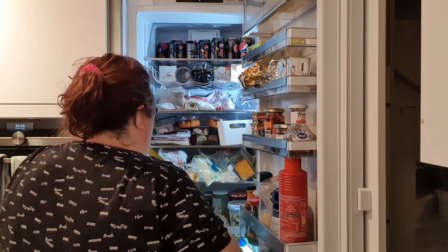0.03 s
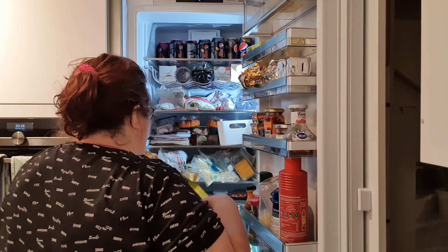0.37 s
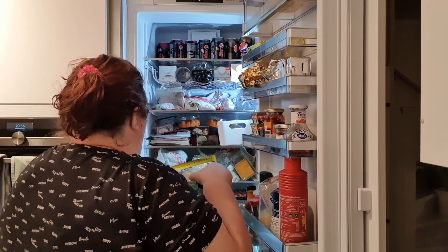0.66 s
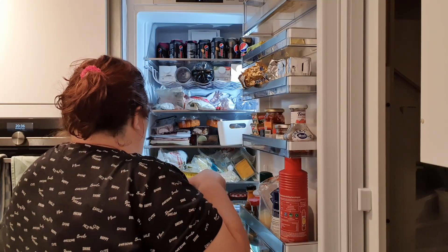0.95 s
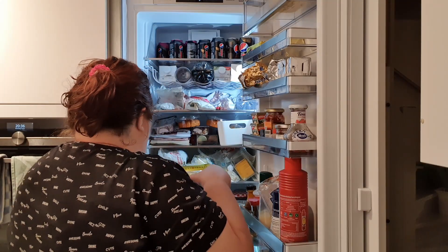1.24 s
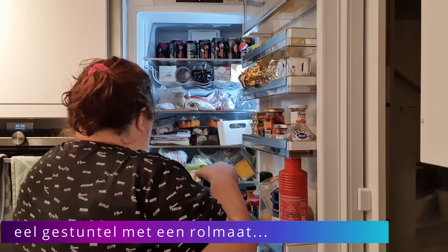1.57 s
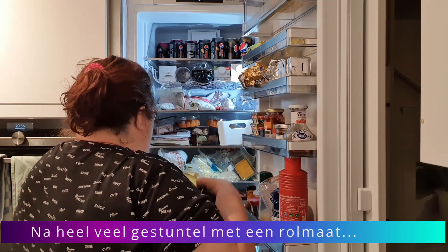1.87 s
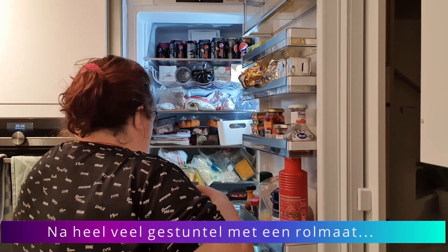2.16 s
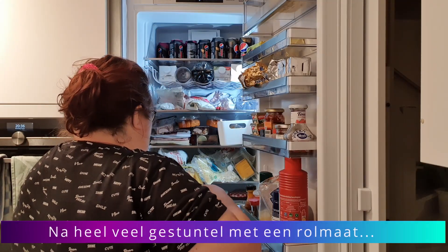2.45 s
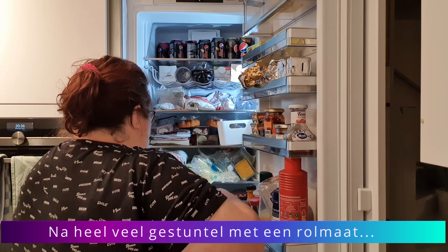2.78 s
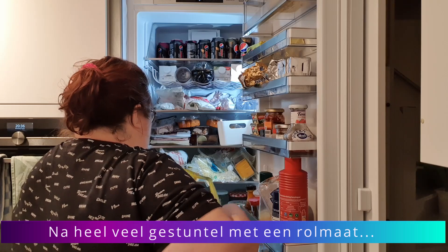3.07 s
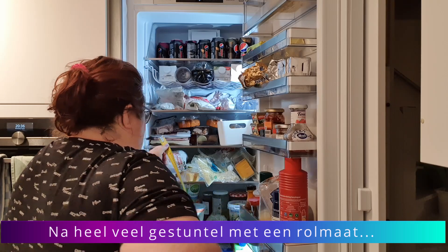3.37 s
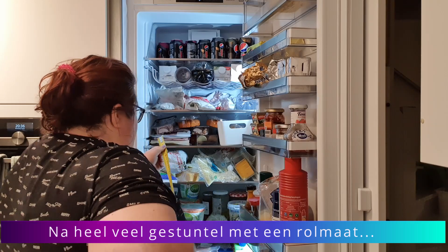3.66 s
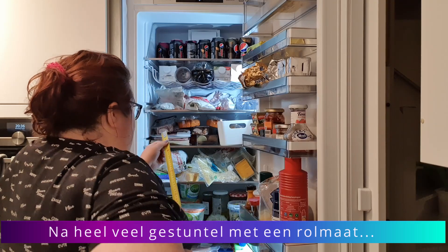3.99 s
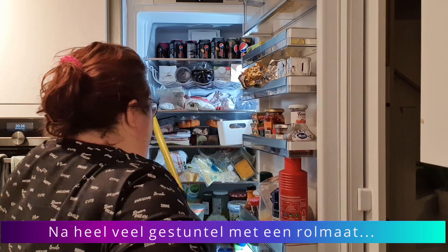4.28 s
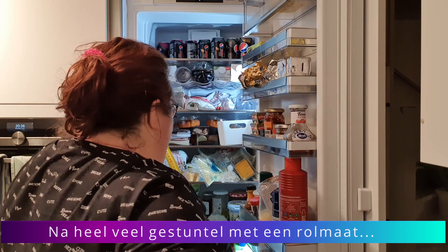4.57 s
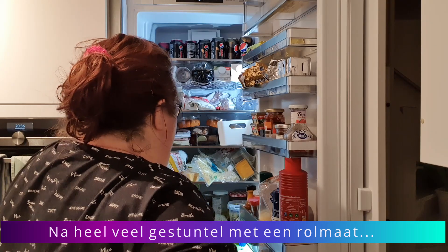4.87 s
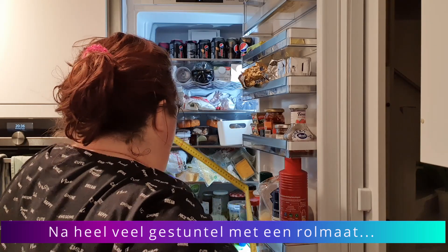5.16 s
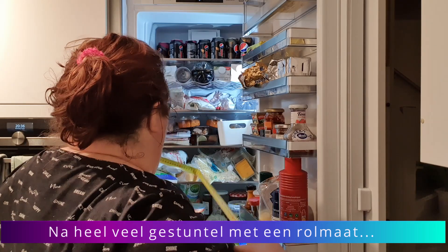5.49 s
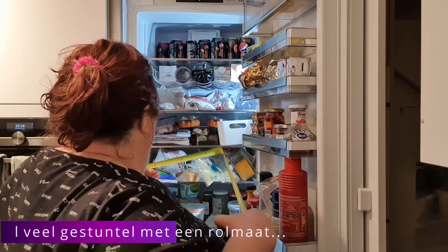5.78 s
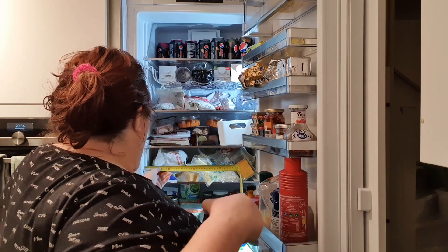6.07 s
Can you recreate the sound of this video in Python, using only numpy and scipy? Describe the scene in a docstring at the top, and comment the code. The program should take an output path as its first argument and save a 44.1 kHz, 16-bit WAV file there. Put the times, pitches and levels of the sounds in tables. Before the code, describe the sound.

A steel tape measure is handled inside an open fridge, heard nearby with a short kitchen echo over faint appliance hum, hiss and low rumble. It starts with light ticks and whispery slides of the blade. The case knocks hollowly on plastic at about 0.9 seconds and several times between 1.6 and 1.9, with a dull scuff. Scattered metallic ticks and small clicks follow, with more bumps around 3.1. At 3.7 seconds the end hook gives a loud, sharp click. From 4.3 to 4.4 the blade rasps brightly through its case and rattles, then buckles with a loud ringing clack at 4.6. Soft sliding and a few faint ticks continue until about 6 seconds, when a firm knock, a quick steel clatter and another short rasp end it.

```python
"""A small kitchen, at an open fridge, with a faint appliance hum, hiss and low rumble underneath.
A steel tape measure is fed inside: its blade whispers over the shelves in tiny slips, rasps through
its case, and ticks and rings as it strikes or buckles. The end hook clicks, and the case knocks
hollowly on plastic drawers and food boxes. The fridge cavity and the kitchen answer every contact."""
import sys
import numpy as np
from scipy import signal
from scipy.fft import rfft, irfft, next_fast_len
from scipy.io import wavfile
from scipy.ndimage import map_coordinates

SR = 44100
rng = np.random.default_rng(int(sys.argv[2]) if len(sys.argv) > 2 else 0)


def generate_wav(signal):
    """Clip the signal to [-1, 1] and save it as 16-bit WAV at the path in sys.argv[1]."""
    frames = np.transpose(np.atleast_2d(signal))
    scaled = np.clip(frames, -1, 1) * 32767
    pcm = np.round(scaled).astype(np.int16)
    wavfile.write(sys.argv[1], SR, pcm)


N = 274857


def amp(db):
    """Decibels to gain."""
    return 10 ** (np.asarray(db) / 20)


def unit(x):
    """Scale to rms 1."""
    return x / np.sqrt(np.mean(x ** 2) + 1e-20)


def along(points, hz):
    """Read a curve of (frequency, value) points on a log frequency axis."""
    freqs, values = np.transpose(points)
    return np.interp(np.log(hz + 1), np.log(freqs + 1), values)


def wobble(rate):
    """Smooth random modulation, rate knots a second."""
    knots = rng.standard_normal(int(N * rate / SR) + 4)
    return map_coordinates(knots, [np.arange(N) * rate / SR])


def swell(peak_s, rise_s, fall_s, db):
    """Envelope of one stroke: up 20 dB per rise_s to its peak, then down 20 dB per fall_s."""
    age = np.arange(N) / SR - peak_s
    return amp(db) * 10 ** -np.maximum(-age / rise_s, age / fall_s)


def coloured(x, db_at):
    """Minimum-phase EQ with a gain of db_at(hz) decibels."""
    n = x.shape[-1]
    size = 2 * next_fast_len(n // 2 + SR // 8)
    gain = amp(db_at(np.fft.rfftfreq(size, 1 / SR)))
    cepstrum = irfft(np.log(gain + 1e-6), size)
    cepstrum[1:size // 2] *= 2
    cepstrum[size // 2 + 1:] = 0
    return irfft(rfft(x, size) * np.exp(rfft(cepstrum)), size)[..., :n]


def body(spectrum, modes):
    """EQ curve of an object: a broad spectrum plus a bell for each mode."""
    return lambda hz: along(spectrum, hz) + sum(
        db / (1 + (2 * (hz - centre) / width) ** 2) for centre, width, db in modes)


def add(out, s, x):
    """Mix x into out from time s."""
    part = out[:, max(0, round(s * SR)):][:, :x.shape[1]]
    part += x[:, :part.shape[1]]


def noise(spectrum, side_db):
    """Steady stereo noise of rms 1."""
    mid, side = coloured(rng.standard_normal((2, N)), lambda hz: along(spectrum, hz))
    return unit(np.array([mid + amp(side_db) * side, mid - amp(side_db) * side]))


# Reverb time of the kitchen: (frequency [Hz], 60 dB decay [s])
KITCHEN_DECAY = [(200, 0.49), (800, 0.32), (2000, 0.32), (5500, 0.3), (10000, 0.29), (16000, 0.21)]

def space(chatter_s, room_db, cavity_t60=0.05, build_s=0.0097, mono_hz=600, rebounds=12):
    """Impulse response: rebounds within chatter_s scatter in the fridge, then the kitchen's tail."""
    hz, t, grains = signal.stft(rng.standard_normal((6, SR // 2)), SR, nperseg=256)
    grains = grains.reshape(2, 3, *grains.shape[1:])  # cavity and tail, each left, right and shared
    alike = .06 + .94 / (1 + (hz[:, None] / mono_hz) ** 3)  # long waves reach both sides alike
    cavity, tail = np.sqrt(alike) * grains[:, 2:] + np.sqrt(1 - alike) * grains[:, :2]
    decay = amp(-60 * t / along(KITCHEN_DECAY, hz)[:, None])
    cavity = signal.istft(cavity, SR, nperseg=256)[1]
    tail = signal.istft(tail * decay, SR, nperseg=256)[1]
    t = np.arange(tail.shape[1]) / SR
    age = t - np.clip(chatter_s, .0005, .05) * np.sort(rng.random(rebounds))[:, None]
    rebound_energy = (age >= 0) * amp(-120 * np.abs(age) / cavity_t60)
    cavity *= np.sqrt(rebound_energy.sum(axis=0))
    tail *= 1 - np.exp(-t / build_s)  # the walls answer a little later
    return cavity / np.linalg.norm(cavity[0]) + amp(room_db) * tail / np.linalg.norm(tail[0])


def friction(envelope, colour, slips_per_s, spread_db):
    """Tiny uneven slips, heard through the body, fridge and room; echoes change as the contact travels."""
    slips = rng.standard_normal(N) * (rng.random(N) < slips_per_s / SR)
    slips = envelope * unit(slips * amp(spread_db * wobble(90)))
    out = np.zeros((2, N))
    step = round(0.3 * SR)
    for start in range(0, N, step):
        if envelope[start:start + step].max() > amp(-90):
            echoes = space(chatter_s=0.0029, room_db=-7)
            add(out, start / SR, signal.fftconvolve(slips[None, start:start + step], echoes, axes=1))
    eq_gain = amp(colour(np.linspace(0, SR / 2, SR // 20)))
    return coloured(out, colour) / np.sqrt(np.mean(eq_gain ** 2))


# Partials of the appliance hum: (frequency [Hz], relative level [dB])
HUM_PARTIALS = [(129.2, -70), (226.1, -58), (269.2, -67.5), (349.9, -76.5)]
# EQ of the room hiss: (frequency [Hz], gain [dB])
HISS_EQ = [(120, -20.5), (200, -20), (240, -2), (482, -20.5), (623, -19.5), (1250, -33), (2380, -34.5),
           (6640, -28), (7830, -34), (11500, -34.5), (16000, -60)]

def room_tone(hum_db=-1, drift_per_s=20, steady=0.68, hiss_db=-66):
    """A wavering appliance hum over faint hiss."""
    t = np.arange(N) / SR
    hum = np.zeros(N)
    for hz, db in HUM_PARTIALS:
        swing = steady + wobble(drift_per_s) + 1j * wobble(drift_per_s)  # level and phase both wander
        hum += amp(db + hum_db) * unit(np.real(swing * np.exp(2j * np.pi * hz * t)))
    return hum + amp(hiss_db) * noise(HISS_EQ, side_db=-3.5)


# An arm leans on the cabinet: (peak time [s], rise [s], fall [s], level [dB])
ARM_SHOVES = [(1.85, 0.6, 0.9, -55.5), (3.18, 0.27, 0.2, -47), (4.4, 0.37, 0.27, -49.5),
              (5.06, 0.14, 0.13, -54.5), (5.99, 0.031, 0.2, -45.5)]
# EQ of the rumble: (frequency [Hz], gain [dB])
RUMBLE_EQ = [(20, -27), (35, -21), (55, -2.5), (80, -3), (115, -1.5), (150, -6), (200, -9.5), (300, -22.5),
             (500, -68)]

def cabinet_rumble(rest_db=-63, waver_db=2, shake_db=-55, follows=0.2, rise_s=0.03, fall_s=0.3):
    """Low room noise; shoves move the cabinet, and each tap and bump shakes it, hard ones a bit more."""
    rest = amp(rest_db + waver_db * wobble(5))
    hits = list(BLADE_HITS) + list(CASE_HITS)
    shakes = [(s, rise_s, fall_s, shake_db + follows * db) for s, db, *_ in hits]
    power = rest ** 2 + sum(swell(*move) ** 2 for move in shakes + list(ARM_SHOVES))
    return np.sqrt(power) * noise(RUMBLE_EQ, side_db=-11.5)


# Plastic rubs on a shelf: (peak time [s], rise [s], fall [s], relative level [dB])
PLASTIC_RUBS = [(1.53, 0.22, 0.47, -53.5), (3.045, 0.05, 0.11, -50), (5.06, 0.2, 1, -64.5)]
# EQ of the rub: (frequency [Hz], gain [dB])
RUB_EQ = [(150, -42), (380, 1.5), (750, 3.5), (950, -16), (2500, -16.5), (6000, -58.5)]
# Drawer resonances, also used for the reel and the bumps: (frequency [Hz], width [Hz], gain [dB])
PLASTIC_MODES = [(383, 19, 10.5), (497, 180, 5.5), (637, 196, 7), (1144, 37, 5), (1380, 84, -9.5),
                 (1998, 160, 9), (2240, 29, 6.5), (3290, 220, 4), (3950, 220, 6)]

def plastic_drag(level_db=-1):
    """Plastic sticks and slips on a shelf with a dull scuff."""
    pressure = sum(swell(*rub) for rub in PLASTIC_RUBS)
    return amp(level_db) * friction(pressure, body(RUB_EQ, PLASTIC_MODES), slips_per_s=700, spread_db=1)


# Blade strokes, some just before it catches: (peak time [s], rise [s], fall [s], relative level [dB])
CREEP_STROKES = [(0.0, 0.01, 0.1, -38), (0.34, 0.27, 0.23, -69.5), (0.471, 0.018, 0.0098, -38.5),
                 (0.55, 0.1, 0.11, -51), (0.73, 0.02, 0.093, -69.5), (1.115, 0.02, 0.02, -46),
                 (1.23, 0.12, 0.21, -61), (1.86, 0.07, 0.42, -56), (2.406, 0.019, 0.037, -38),
                 (2.479, 0.018, 0.014, -41), (3.06, 0.35, 0.68, -49), (3.45, 0.3, 0.36, -55.5),
                 (3.88, 0.2, 0.24, -47), (4.25, 0.14, 0.22, -30.5), (4.55, 0.2, 0.13, -48),
                 (5.08, 0.028, 0.06, -46), (5.17, 0.85, 0.91, -53.5), (5.94, 0.13, 0.078, -57.5)]
# EQ of steel on a shelf: (frequency [Hz], gain [dB])
CREEP_EQ = [(500, -51), (900, -12), (1400, -11.5), (2000, -8), (2700, -9.5), (3500, -4.5), (4200, -3.5),
            (5200, -8), (6700, -5), (7900, -12.5), (11000, -14), (16000, -16)]

def blade_creep(level_db=-4):
    """The blade whispers over the shelves in fine, dense slips."""
    motion = sum(swell(*stroke) for stroke in CREEP_STROKES)
    return amp(level_db) * friction(motion, lambda hz: along(CREEP_EQ, hz), slips_per_s=2900, spread_db=1.5)


# The blade runs in its case: (peak time [s], rise [s], fall [s], relative rasp [dB], relative reel [dB])
BLADE_PULLS = [(4.325, 0.15, 0.11, -23, -33.5), (4.403, 0.02, 0.074, -25, -27),
               (6.032, 0.037, 0.073, -20.5, -36)]
# EQ of the rasp: (frequency [Hz], gain [dB])
RASP_EQ = [(710, -21.5), (1200, -6.5), (2180, -9), (2590, -4.5), (4080, -4), (5300, -7.5), (6800, -4),
           (7660, -10), (8630, -8.5), (14000, -18), (16000, -35.5)]
# EQ of the reel: (frequency [Hz], gain [dB])
REEL_EQ = [(100, -32.5), (250, 0.5), (400, -1.5), (520, -2), (700, 2.5), (1000, -4), (1500, -2.5),
           (2500, -15.5), (6000, -57)]

def blade_run(rasp_db=-5, reel_db=-5):
    """Bright steel rasps through the case over the darker, coarser grain of the reel."""
    rasp_envelope = sum(swell(*shape, db) for *shape, db, _ in BLADE_PULLS)
    reel_envelope = sum(swell(*shape, db) for *shape, _, db in BLADE_PULLS)
    rasp = friction(rasp_envelope, body(RASP_EQ, STEEL_MODES), slips_per_s=3500, spread_db=2.5)
    reel = friction(reel_envelope, body(REEL_EQ, PLASTIC_MODES), slips_per_s=670, spread_db=5.5)
    return amp(rasp_db) * rasp + amp(reel_db) * reel


# The case bumps plastic:
# (time [s], relative level [dB], relative clack [dB], cutoff [Hz], hollow note [Hz], chatter [s])
CASE_HITS = [(0.921, -31.5, 4.5, 17100, 550, 0.0072), (0.931, -30, 9.5, 2700, 560, 0.023),
             (1.257, -35, -10.5, 2210, 488, 0.0024), (1.655, -30, 0.5, 4600, 477, 0.0025),
             (1.667, -34, 6, 4260, 480, 0.0067), (1.712, -32.5, 5.5, 6000, 686, 0.0039),
             (1.744, -39, 9.5, 8000, 454, 0.0032), (1.848, -33.5, 9.5, 2390, 640, 0.0024),
             (1.911, -52, -11, 11700, 654, 0.003), (2.057, -41, -1, 3000, 605, 0.0057),
             (2.184, -48.5, -1, 5000, 675, 0.0068), (2.259, -41.5, -5.5, 2000, 640, 0.004),
             (2.911, -41, 5, 6000, 590, 0.0027), (3.025, -39, -4, 5000, 640, .003),
             (3.087, -36.5, 17, 2000, 545, 0.0077), (3.128, -30, 2, 2400, 562, 0.0016),
             (3.443, -42, 1.5, 3500, 570, 0.0088), (4.401, -34, 17, 6500, 695, .006),
             (5.974, -18, -15, 9000, 1054, 0.0036)]

def case_bumps(level_db=29, clack_trim_db=-6, soft_slope=5, hollow_width_hz=130, hollow_db=6):
    """Knocks on drawers and boxes; each booms at its own hollow note, and soft contact cuts the treble."""
    out = np.zeros((2, N))
    for s, db, clack, cutoff_hz, note_hz, chatter_s in CASE_HITS:
        clack += clack_trim_db
        boom = [(0.42 * note_hz, -30), (0.5 * note_hz, -13), (0.81 * note_hz, -3), (1.17 * note_hz, -1),
                (1.06 * note_hz + 300, clack / 2 - 5)]
        crack = [(1900, clack - 2), (2300, clack), (3000, clack - 3), (8000, clack - 9)]
        drawer = body(boom + crack, list(PLASTIC_MODES) + [(note_hz, hollow_width_hz, hollow_db)])
        softened = lambda hz: drawer(hz) - 20 * np.log10(1 + (hz / cutoff_hz) ** soft_slope)
        add(out, s, amp(db + level_db) * coloured(space(chatter_s, room_db=-1.5), softened))
    return out


# Hard clicks of the end hook: (time [s], relative level [dB])
HOOK_HITS = [(1.9472, -23), (2.9394, -26.5), (3.719, -7.5)]
# EQ of the click: (frequency [Hz], gain [dB])
HOOK_EQ = [(200, -18), (700, -14.5), (1200, -9), (1550, 1.5), (2100, -1), (2800, 2), (3500, 0), (4400, 2),
           (5200, -13), (16000, -29.5)]

def hook_clicks(level_db=21, direct_db=-7, bounce_s=0.0033):
    """The hook's sharp transient arrives directly, ahead of its rebounds and echoes."""
    out = np.zeros((2, N))
    for s, db in HOOK_HITS:
        click = space(bounce_s, room_db=-2.5)
        click[:, 0] += amp(direct_db)
        add(out, s, amp(db + level_db) * coloured(click, lambda hz: along(HOOK_EQ, hz)))
    return out


# Resonances of the blade, also used for its rasp: (frequency [Hz], width [Hz], gain [dB])
STEEL_MODES = [(1648, 80, 2), (1820, 130, 2.5), (2205, 170, 4.5), (3330, 17, 4), (3500, 81, 3.5),
               (4138, 85, 3.5), (4630, 89, 4.5), (6000, 70, 0), (6200, 57, 6), (6920, 140, 5.5),
               (8770, 120, 3), (10120, 80, -3)]

def bent_blade_modes(lightness_db, detune=0.03, gain_spread=0.83, freeing=0.025):
    """Each bend detunes the blade's modes and favours other ones; a light touch lets them ring longer."""
    free = 1 + freeing * lightness_db
    chance = rng.standard_normal((len(STEEL_MODES), 2))
    return [(hz * (1 + detune * bend), width / free, db * (free + gain_spread * favour))
            for (hz, width, db), (bend, favour) in zip(STEEL_MODES, chance)]


# The blade strikes or buckles; knock, clack and edge shape the lows, mids and top:
# (time [s], relative level [dB], knock [dB], clack [dB], edge [dB], bending mode [Hz])
BLADE_HITS = [(0.001, -36.5, -5.5, -8, 3.5, 3780), (0.466, -38.5, -15, -26, -11, 6150),
              (1.113, -27, -5, -8.5, -4, 4510), (1.262, -58, -4, 2, 4.5, 3880),
              (1.346, -50, -1, -7, -3.5, 4400), (1.877, -46.5, -8, 0, -9, 3200),
              (1.945, -27, -3.5, 2, -7, 3330), (2.047, -36, 4, -8.5, -8.5, 3020),
              (2.387, -46, 0, 0, -18, 6000), (2.472, -32, -10, -4.5, -14.5, 1730),
              (2.638, -46.5, -18, -1, -3.5, 4050), (2.747, -47, -10, -11, -13, 3780),
              (2.812, -35, -6.5, -5, -5, 3380), (2.878, -41, 7, 2.5, -14, 1010),
              (2.938, -38.5, 8.5, 6.5, -4, 3660), (3.022, -34, 0, -3, -2.5, 1910),
              (3.065, -30, -5, -2, -9, 3232), (3.127, -32.5, 3, 0, -14, 2070),
              (3.313, -25.5, -7.5, -2, -11.5, 2070), (3.687, -15.5, -12.5, -0.5, -12.5, 4270),
              (3.722, -18.5, -9, -9, -13, 4170), (3.913, -40.5, 2, 1, -5.5, 1610),
              (3.981, -40.5, -10, 1, -37, 2920), (4.281, -28.5, -3, -22.5, 4.5, 3250),
              (4.317, -12.5, -28.5, -12.5, -2.5, 2990), (4.376, -18, -16, -8, -7.5, 3220),
              (4.4, -16, -18.5, -3.5, -8, 2220), (4.603, -23, -18, -5, -4.5, 4000),
              (4.623, -12, -20.5, -7.5, -6.5, 1823), (4.627, -17.5, -32, -11, -13, 3930),
              (4.946, -44, -13, -14, -1.5, 3850), (5.076, -32, -19, -19, -2.5, 3580),
              (5.27, -41, -13, -29, 0.5, 4344), (5.48, -44.5, -9, -8.5, -1.5, 4200),
              (5.611, -49.5, -14, -14.5, 0.5, 4260), (5.891, -42, -21, -7.5, -4.5, 4150),
              (5.972, -18.5, -10.5, 0, -1.5, 3670), (5.986, -26, -8, 3.5, -6, 1620),
              (6.009, -22.5, -13, -10, 2, 2880), (6.026, -19, -12.5, -8, -1.5, 4280)]

def blade_taps(level_db=27, mode_width=0.069, mode_db=15, mode_fade=0.33, chatter_s=0.006, dulling=0.39):
    """Steel rings and the shelf knocks; the bending mode shifts with free length and leads in hard hits."""
    out = np.zeros((2, N))
    hardest_db = max(db for _, db, *_ in BLADE_HITS)
    for s, db, knock, clack, edge, mode_hz in BLADE_HITS:
        knock, clack, edge = knock + 4, clack - 1, edge - 2  # band trims in dB
        lightness_db = hardest_db - db
        spectrum = [(60, knock - 22), (300, knock - 9), (690, knock), (1150, (knock + clack) / 2 - 3),
                    (1600, clack - 1), (2600, clack - 1), (3300, -3.5), (6600, -6.5),
                    (7700, edge - 1), (10500, edge), (15500, edge - 1 - dulling * lightness_db)]
        bending_mode = (mode_hz, mode_width * mode_hz, mode_db - mode_fade * lightness_db)
        blade = body(spectrum, bent_blade_modes(lightness_db) + [bending_mode])
        stretch = 1 + 0.014 * lightness_db  # a light touch chatters for longer
        add(out, s, amp(db + level_db) * coloured(space(chatter_s * stretch, room_db=0), blade))
    return out


def scene():
    """Hits and slides over the kitchen's ambience."""
    hits = blade_taps() + hook_clicks() + case_bumps()
    slides = blade_creep() + blade_run() + plastic_drag()
    return hits + slides + cabinet_rumble() + room_tone()


# Stereo balance across the band: (frequency [Hz], left minus right [dB])
STEREO_TILT = [(300, 0.5), (1300, -1.5), (3000, -0.5), (4300, 2.5), (5500, 6), (6700, 4.5), (8500, -2.5),
               (11000, 0), (16000, 0.5)]

def record(dry):
    """Master EQ: left and right get their own colour, and a steep low-pass ends the band."""
    top_hz = 16050
    size = next_fast_len(N + SR // 2)
    hz = np.fft.rfftfreq(size, 1 / SR)
    balance = amp(np.outer([.5, -.5], along(STEREO_TILT, hz)))
    low_pass = 1 / (1 + (hz / top_hz) ** 200)
    return irfft(rfft(dry, size) * balance * low_pass, size)[:, :N]


dry = scene()
out = record(dry)
generate_wav(out)
```